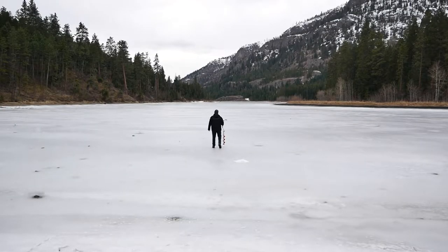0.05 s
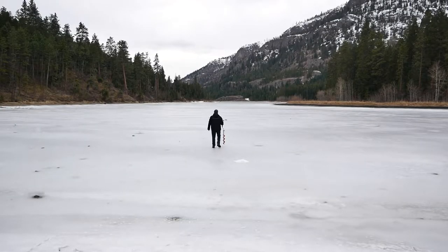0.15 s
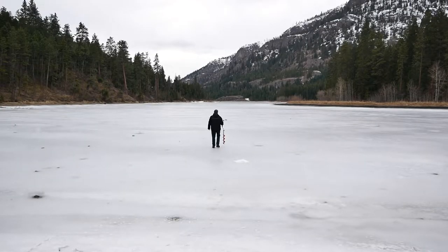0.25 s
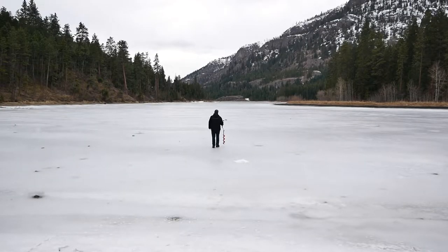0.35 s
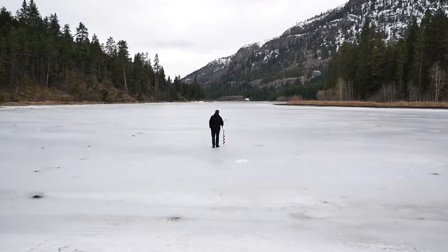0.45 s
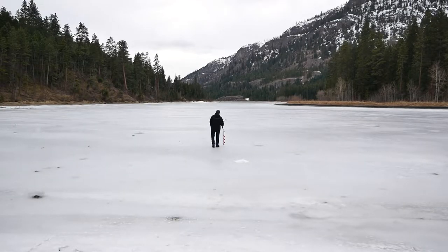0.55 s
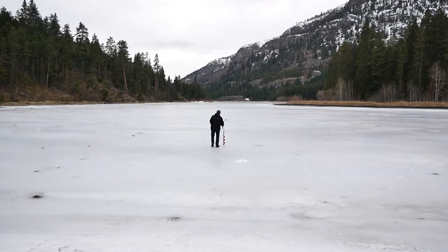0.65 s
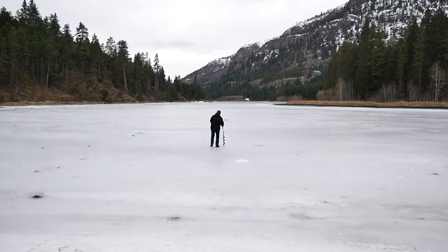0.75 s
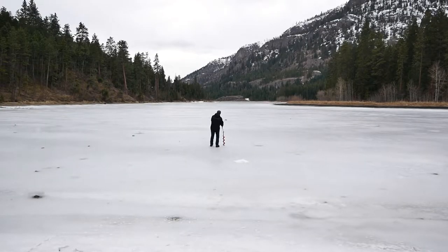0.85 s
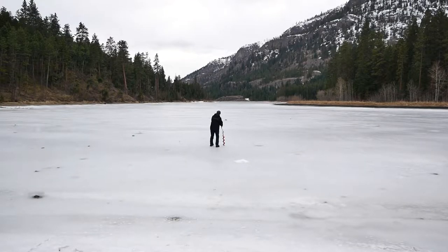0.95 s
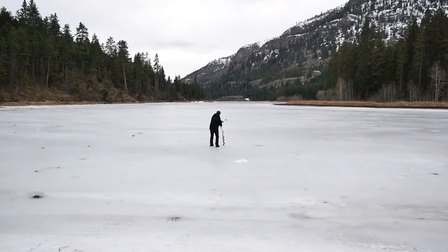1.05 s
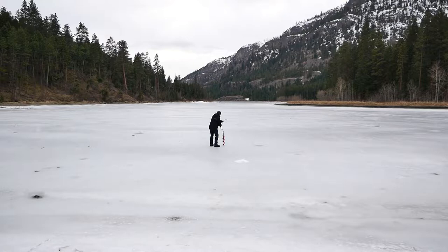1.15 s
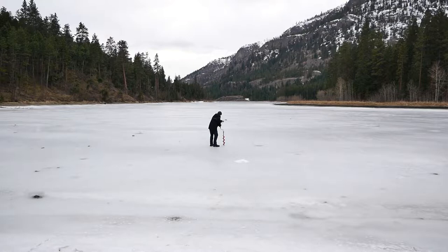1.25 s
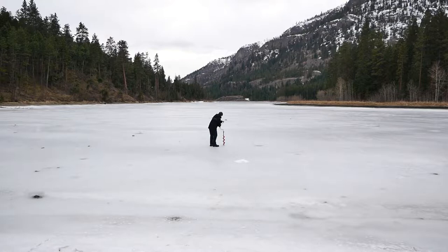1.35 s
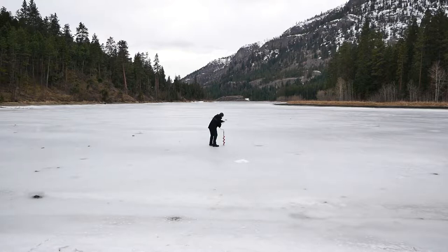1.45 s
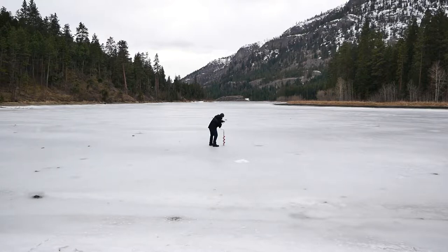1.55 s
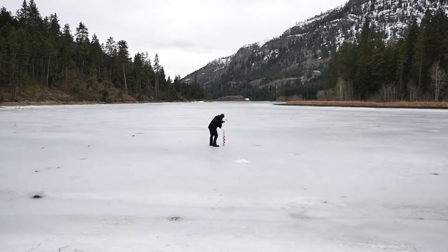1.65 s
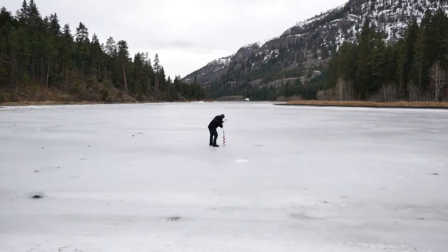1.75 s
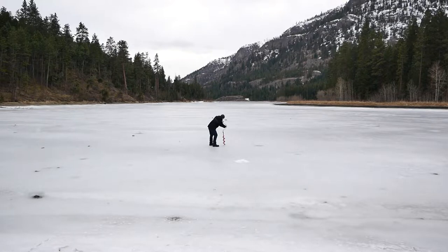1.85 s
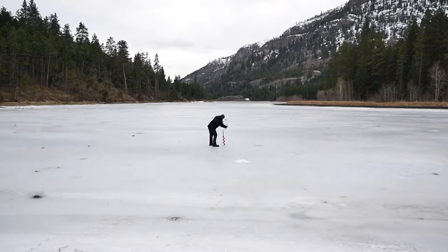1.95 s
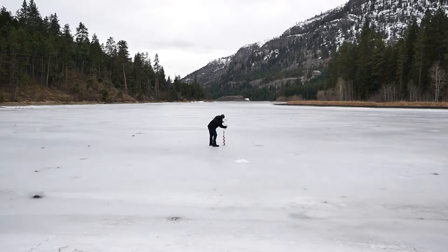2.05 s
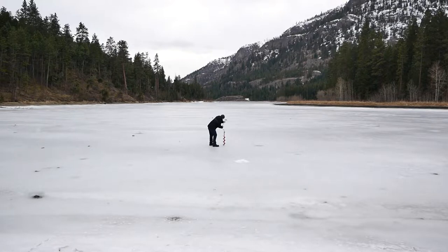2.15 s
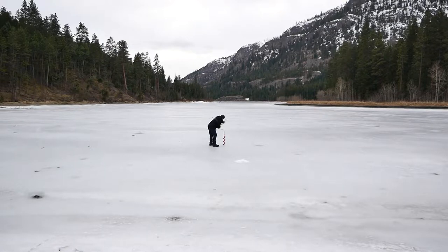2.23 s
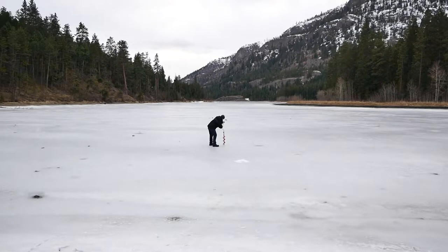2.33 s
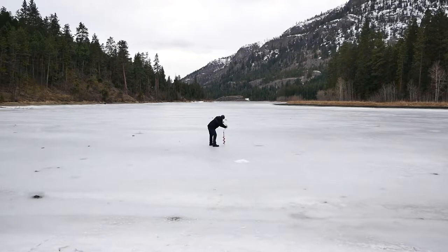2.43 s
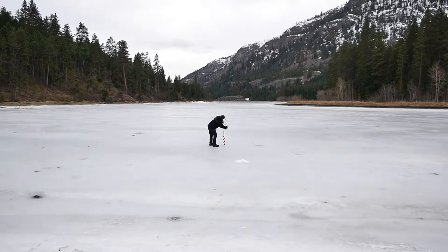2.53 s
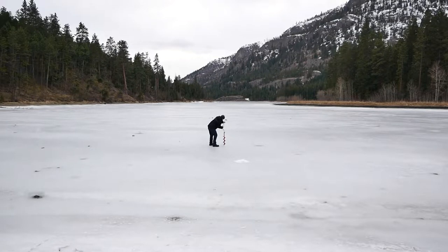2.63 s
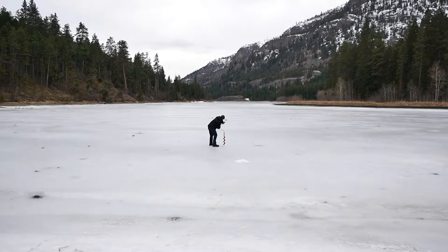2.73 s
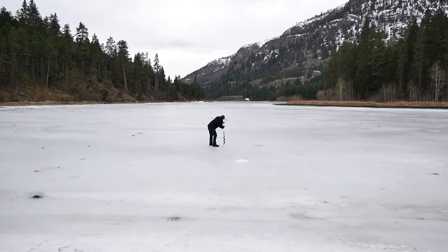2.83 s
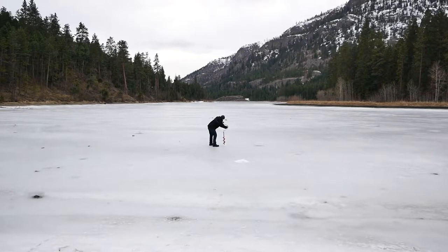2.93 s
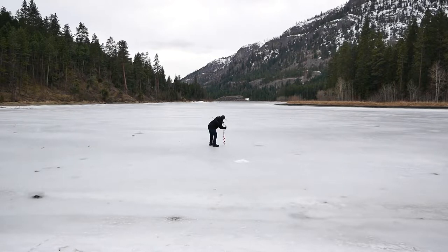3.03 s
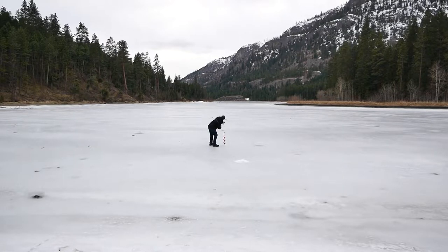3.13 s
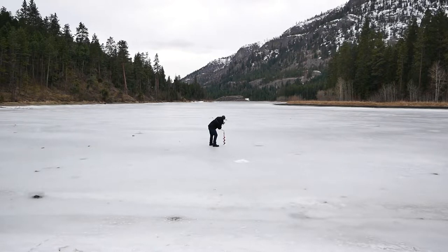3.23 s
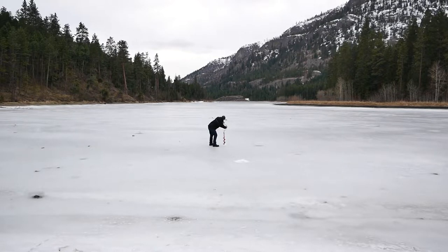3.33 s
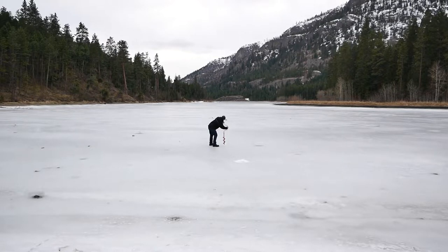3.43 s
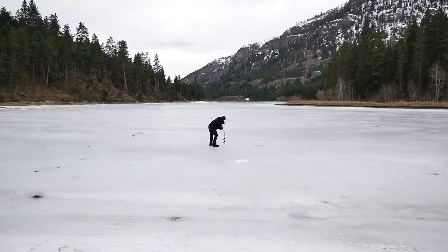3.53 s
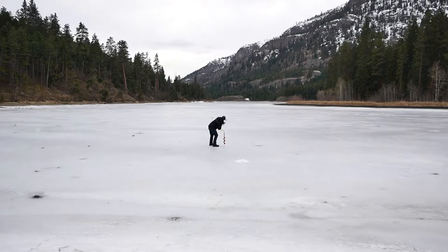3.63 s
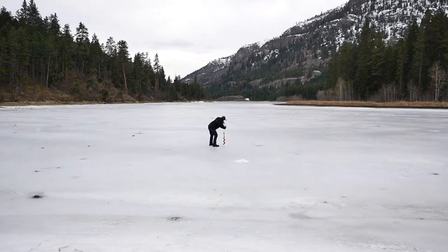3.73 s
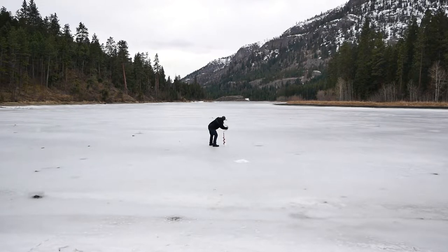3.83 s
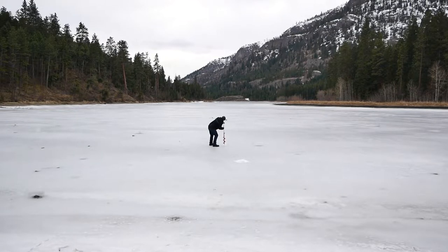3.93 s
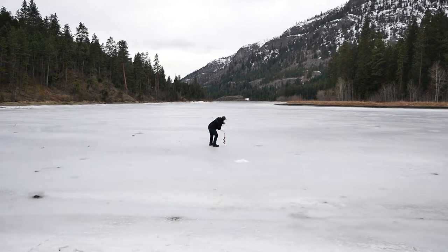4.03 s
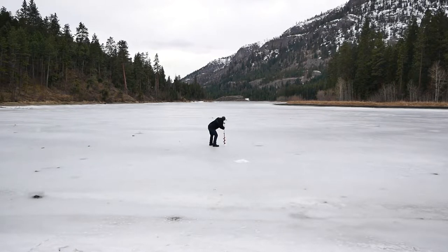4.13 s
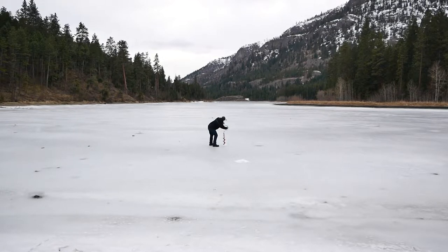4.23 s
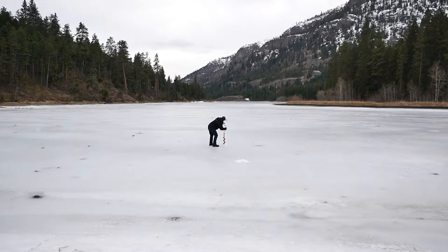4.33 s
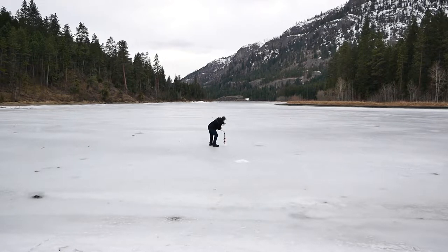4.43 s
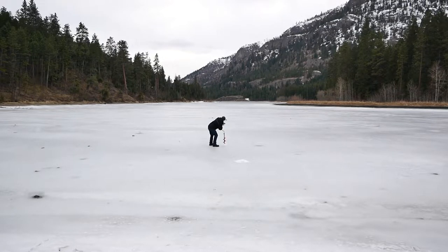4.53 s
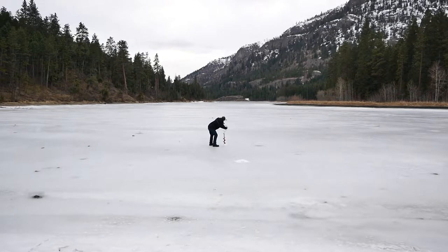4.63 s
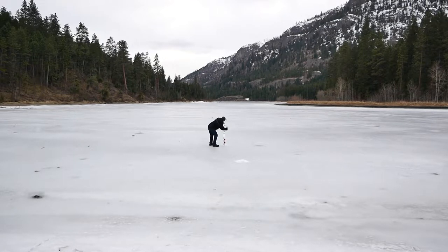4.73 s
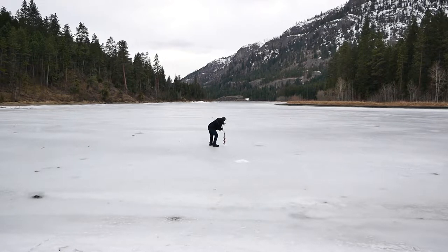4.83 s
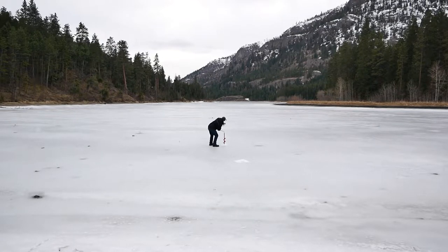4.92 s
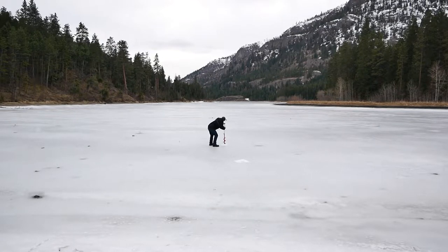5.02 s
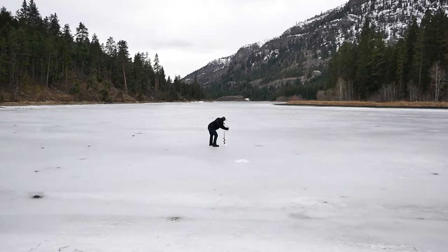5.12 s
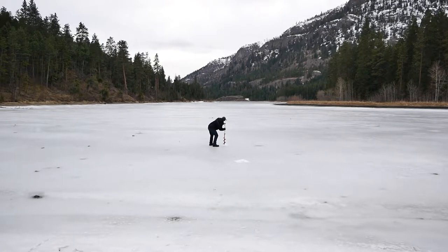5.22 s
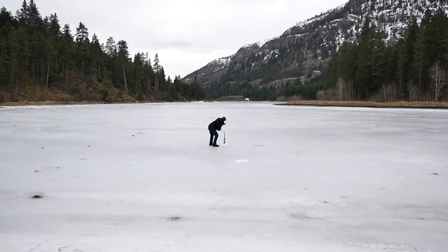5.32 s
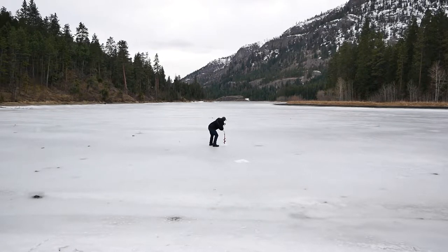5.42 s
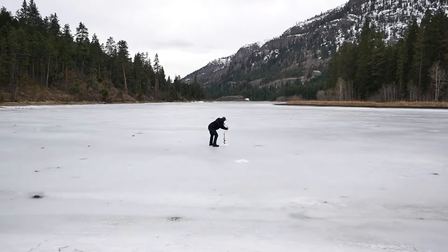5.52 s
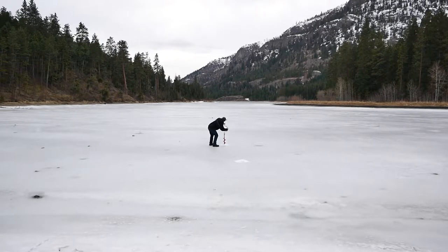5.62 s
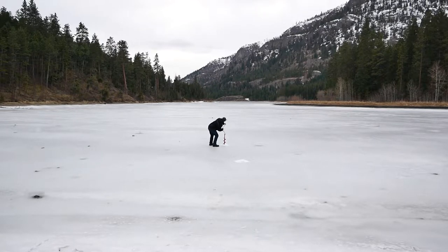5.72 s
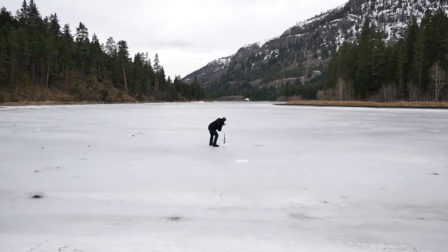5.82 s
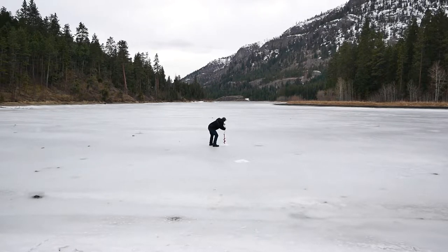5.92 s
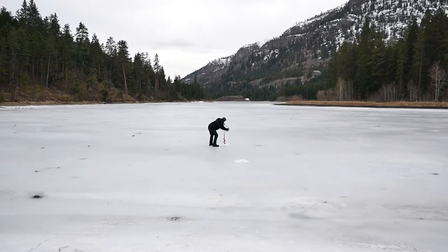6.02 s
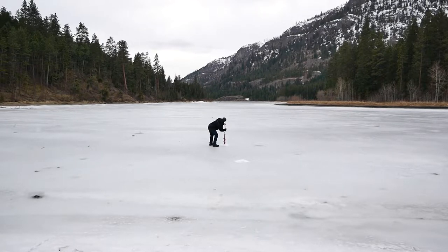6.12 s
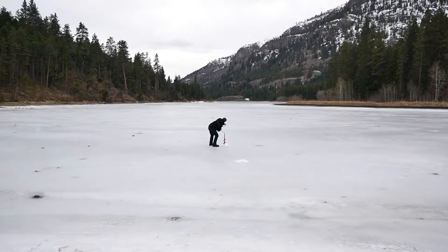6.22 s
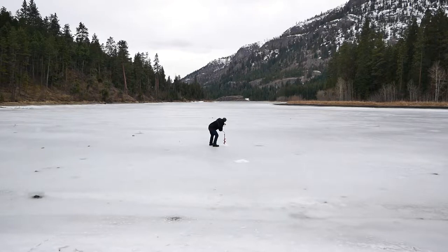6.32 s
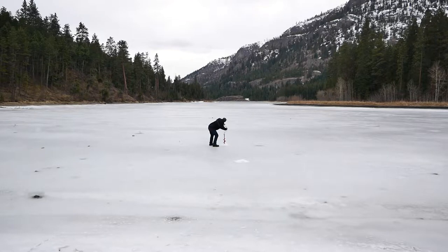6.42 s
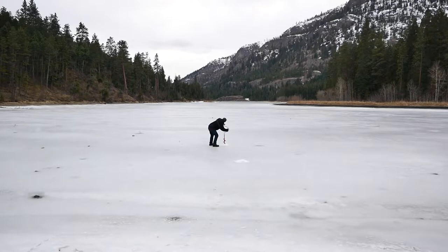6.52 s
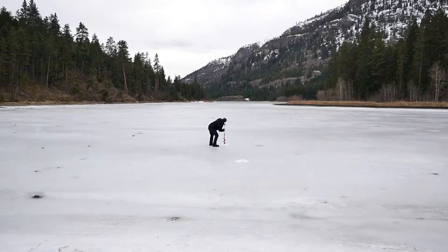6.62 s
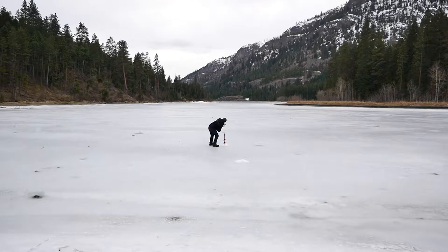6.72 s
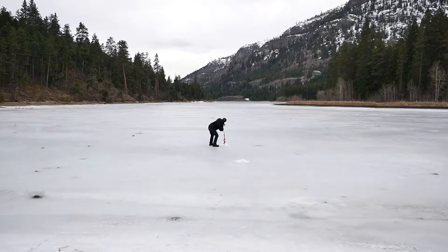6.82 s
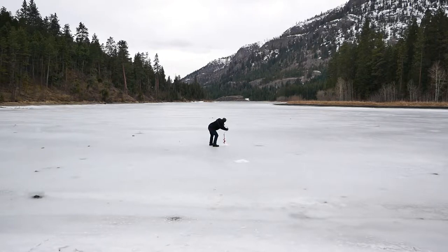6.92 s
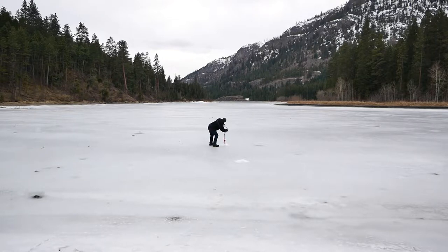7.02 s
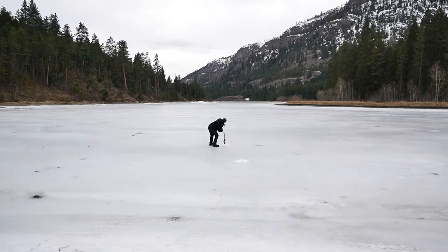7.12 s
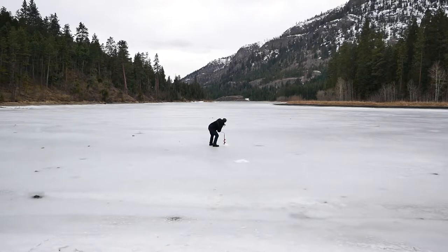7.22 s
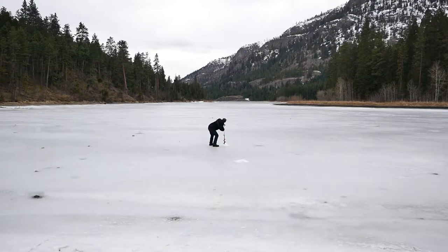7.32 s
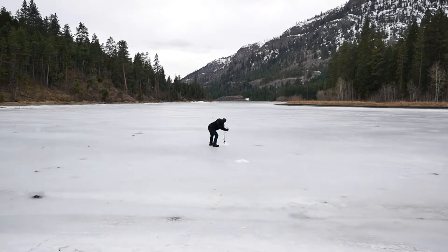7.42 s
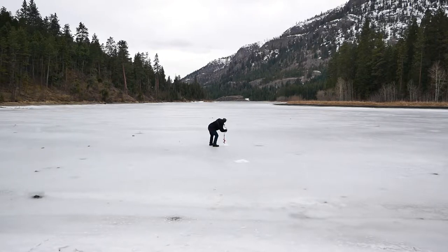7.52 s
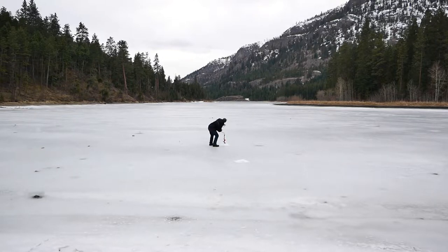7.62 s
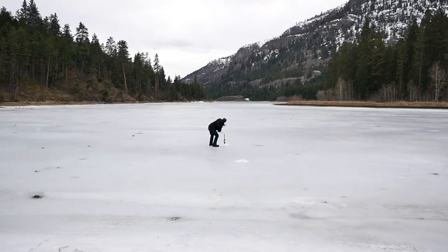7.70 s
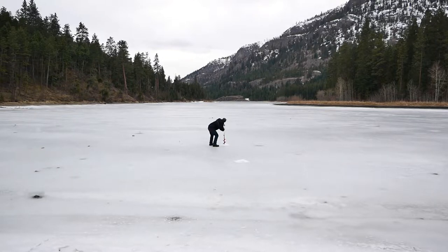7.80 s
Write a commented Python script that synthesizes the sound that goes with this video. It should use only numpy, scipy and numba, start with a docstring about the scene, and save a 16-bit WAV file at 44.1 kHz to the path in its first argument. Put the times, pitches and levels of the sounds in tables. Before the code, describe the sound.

A quiet frozen lake outdoors: low wind buffets the microphone over a soft hush and a very faint engine drone far off. From 0 to 2 s, boots, jacket and blade tips rub the ice in short grainy scuffs, clearest near 0.45, 0.87 and 1.3 s, some with sliding squeaks and tiny clicks. Around 1.7 to 2.5 s a hand auger skates lightly, then bites, reaching full force near 2.9 s. It grinds on without stopping, crunchy ice chips and hissing shavings ringing the steel, the tone swelling about every 0.45 s. Small knocks come at 3.3 s; harder cracks and clanks at 4.6 to 4.75, 5.1 to 5.9, 6.1, 6.5 and 7.55 s, the sharpest near 5.6. From about 4 s the grind gains body and a hollow low boom grows, throbbing with the blades, with deep shaft shudder. Wind rises slightly toward the end, drilling still going at 7.86 s.

```python
"""Light wind rumbles on the microphone over the hush and a far engine drone of the valley, all from filtered noise.
Boots, jacket and blade tips scuff on lake ice: grainy clicks with sliding squeaks. Lumps snap loose and knock the steel.
A hand auger skates a little, then bites and is cranked round: a hail of random ice chips rings the steel flighting,
whose notes swell and fade with each turn. As the hole deepens its bore booms and the shaft shudders, both from noise
through resonances."""
import sys
import numpy as np
from scipy import signal
from scipy.fft import rfft, irfft
from scipy.io import wavfile
from scipy.ndimage import uniform_filter1d
from numba import njit

SR = 44100
rng = np.random.default_rng(int(sys.argv[2]) if len(sys.argv) > 2 else 0)


def to_wav(s):
    """Save 16-bit WAV."""
    ch = np.atleast_2d(s).T  # columns
    pcm = np.round(np.clip(ch, -1, 1) * 32767)  # PCM
    wavfile.write(sys.argv[1], SR, pcm.astype(np.int16))


N = 346626
STEP = 32  # samples between slow control values

# how hard the blades cut, and how much the shavings slide up the flighting:
# time_s [s], bite_gain_db [dB], shavings_gain_db [dB]
CUT = [(1.569, -66, -61), (1.719, -41.5, -48), (1.81, -60, -48.5), (1.99, -39.5, -40), (2.1, -50, -47.5),
       (2.18, -38.5, -35), (2.57, -29, -31), (2.92, -22.5, -29.5), (3.2, -24.5, -31.5), (3.9, -23, -29.5),
       (4.7, -22.5, -28.5), (5.6, -24, -30), (6.25, -25, -32), (7.0, -24.5, -31), (7.2, -25.5, -32.5),
       (7.86, -27, -32.5)]
# moments when the crank handle passes the same place: time_s [s]
TURNS = [2.2, 2.65, 3.1, 3.55, 4.0, 4.42, 4.9, 5.35, 5.76, 6.2, 6.66, 7.18, 7.65, 8.1]


def undb(db):
    """Turn decibels into a plain multiplier."""
    return 10 ** (np.asarray(db) / 20)


def level(x, db):
    """Scale a sound so that its average (RMS) level is the given dB."""
    return x * undb(db) / np.sqrt(np.mean(x ** 2))


def gain_of(db):
    """Gain at every sample from slow dB values."""
    return np.repeat(undb(db), STEP)[:N]


def curves(table):
    """Columns of a table, joined by straight lines, at every sample."""
    s, *columns = np.transpose(table)
    return [np.interp(np.arange(N) / SR, s, column) for column in columns]


def turn_at(t):
    """Number of crank turns made by time t, counted from the first pass of the handle."""
    return np.interp(t, TURNS, np.arange(len(TURNS)))


def walk(rate):
    """Random levels held 1 / rate s and smoothed twice, one value every STEP samples; spread near 1."""
    hold, size = int(SR / STEP / rate), N // STEP + 1
    held = np.repeat(rng.standard_normal(size // hold + 1), hold)
    return 1.48 * uniform_filter1d(uniform_filter1d(held, hold), hold)[:size]


def colour(x, shape, size=4096):
    """Filter x to a curve of (Hz, dB), responding only after each input, and set its RMS to 1."""
    hz, db = np.transpose(shape)
    log_hz = np.log(np.fft.rfftfreq(size, 1 / SR) + 1)
    log_gain = np.interp(log_hz, np.log(hz), db) * np.log(10) / 20
    # folding the cepstrum makes the filter respond as early as it can, with no sound before its cause
    cepstrum = irfft(log_gain)
    cepstrum[1:size // 2] *= 2
    cepstrum[size // 2 + 1:] = 0
    response = irfft(np.exp(rfft(cepstrum)))
    return level(signal.fftconvolve(x, response)[:N], 0)


def ring(x, hz, width_hz):
    """One resonance, gain 1 at its centre; a narrow one rings longer."""
    return signal.lfilter(*signal.iirpeak(hz, hz / width_hz, SR), x)


@njit
def sweep(x, hz, damping):
    """A resonance whose centre moves (state-variable band-pass); damping is width over pitch."""
    y, band, low = np.empty(len(x)), 0., 0.
    for i in range(len(x)):
        g = np.tan(np.pi * hz[i] / SR)
        v = (band + g * (x[i] - low)) / (1 + g * (g + damping))
        band, low, y[i] = 2 * v - band, low + 2 * g * v, damping * v
    return y


def soften(x, hz):
    """Contact that lasts a moment dulls the top."""
    return signal.sosfilt(signal.butter(2, hz, fs=SR, output="sos"), x)


def chips(rate, spread_db, flurry_db, push=0.44):
    """Random clicks, rate per second, a few much larger, in flurries and mostly pushing one way."""
    when, size, sign = rng.random(N), rng.exponential(size=N), rng.standard_normal(N)
    clicks = (when < rate / SR) * (sign + push) * undb(spread_db * size)
    hail = clicks * gain_of(flurry_db * walk(60))
    return level(signal.sosfilt(signal.butter(2, 500, "high", fs=SR, output="sos"), hail), 0)


def air():
    """Wind buffets and rumbles on the microphone over the distant hush, each a coloured noise."""
    # wind on the microphone: time_s [s], buffet_db [dB], rumble_db [dB]
    wind_levels = [(0.0, -43, -48), (1.0, -43.5, -45.5), (1.6, -46, -50.5), (2.0, -39, -49),
                   (2.5, -49, -52), (4.2, -49.5, -45.5), (5.5, -46, -47), (6.4, -40.5, -47),
                   (7.86, -36.5, -42)]
    # tone of the buffeting, the rumble and the hush: frequency_hz [Hz], relative_level_db [dB per Hz]
    buffet_tone = [(6, -3), (14, 4.5), (24, 12), (34, 13), (45, -6), (70, -45.5)]
    rumble_tone = [(35, -10), (60, 8.5), (125, -6), (165, -5), (270, -11), (400, -22), (800, -78)]
    hush_tone = [(120, -18), (220, 2), (400, -6.5), (630, -9), (900, -9.5), (1400, -9), (1800, -15.5),
                 (2600, -24), (4000, -34), (8000, -51), (15600, -68)]
    buffet_db, rumble_db = curves(wind_levels)
    buffet = colour(rng.standard_normal(N), buffet_tone, size=32768)
    rumble = colour(rng.standard_normal(N), rumble_tone, size=32768)
    wind = undb(buffet_db) * buffet + undb(rumble_db) * rumble
    hush = colour(rng.standard_normal(N), hush_tone)
    return wind + undb(-52.5) * hush


def drone():
    """A far engine down the valley: narrow bands of noise that glide with its speed."""
    # engine speed as a base frequency: time_s [s], base_hz [Hz]
    engine_speed = [(0, 132.5), (.8, 123), (1.4, 115.5), (2.4, 116), (3.2, 113.5), (4.5, 123), (7.86, 108)]
    # its partials: multiple of the base frequency [ratio], level_db [dB]
    partials = [(.72, -55.5), (0.999, -55), (2.33, -63.5)]
    hz, noise = curves(engine_speed)[0], rng.standard_normal(N)
    total = 0
    for multiple, db in partials:
        band = sweep(sweep(noise, multiple * hz, 0.044), multiple * hz, 0.051)
        total = total + level(band, db)
    return total


def swell(t, rise, hold, fall):
    """Rise, hold and fall, straight in dB."""
    fade_db = 26.5
    up = np.minimum(np.minimum(t / rise, (rise + hold + fall - t) / fall), 1)
    return undb(fade_db * (up - 1))


def scuffs():
    """Grainy rubbing of boots, jacket and blade tips, with a squeaky resonance that slides."""
    # start_s [s], rise_s [s], hold_s [s], fall_s [s], hiss_db [dB], squeak_db [dB],
    # squeak pitch it starts from_hz [Hz] and glides towards to_hz [Hz], squeak fade linger_s [s]
    scuff_list = [(0.0, 0.0069, 0.2, .03, -63.5, -59, 1320, 1100, .05),
                  (0.1, .035, .008, .03, -50, -62, 1330, 1300, .05),
                  (0.452, .004, 0.042, 0.077, -40, -67, 1390, 1700, .08),
                  (0.641, 0.073, 0.022, 0.051, -46.5, -68, 1900, 1900, .06),
                  (0.867, .002, 0.013, 0.077, -38, -41.5, 2280, 1750, 0.23),
                  (0.987, 0.0018, 0.064, 0.037, -48, -63, 1950, 2100, 0.06),
                  (1.03, 0.037, .1, .04, -62.5, -80, 1600, 1100, .05),
                  (1.158, 0.029, 0.13, 0.094, -53.5, -63, 1830, 1700, .06),
                  (1.27, 0.16, 0.038, .09, -40, -46.5, 1260, 1220, 0.067),
                  (1.458, 0.028, 0.11, .05, -58, -71, 1500, 1500, 0.044),
                  (1.62, .003, .04, 0.087, -59, -55, 1500, 1500, .1),
                  (1.602, 0.094, 0.073, 0.054, -43.5, -59, 1400, 1200, .05),
                  (1.802, .14, 0.095, .08, -45.5, -56, 1900, 1700, .05)]
    # tone of the hiss: frequency_hz [Hz], relative_level_db [dB per Hz]
    hiss_tone = [(1500, -1), (2400, -2), (3900, -2), (6300, -9), (8100, -3), (9400, -16.5), (13000, -19),
                 (15600, -21)]
    grit, out = chips(6000, 0.47, 2.5), np.zeros(N)
    hiss, t = colour(grit, hiss_tone), np.arange(SR // 2) / SR
    for start, rise, hold, fall, hiss_db, squeak_db, from_hz, to_hz, linger in scuff_list:
        first = int(start * SR)
        part = slice(first, first + len(t))
        glide_s = 0.019 + rise + hold
        hz = to_hz + (from_hz - to_hz) * np.exp(-t / glide_s)
        squeak = level(sweep(sweep(grit[part], hz, 0.19), hz, .5), 0)
        early = 0.49 * rise  # the squeak speaks a little before the hiss is full
        out[part] += undb(hiss_db) * swell(t, rise, hold, fall) * hiss[part]
        out[part] += undb(squeak_db) * swell(t, early, hold + rise - early, linger) * squeak
    return out


def cracks():
    """A short damped snap and a noisy splinter for each knock, and the blow that it gives the steel."""
    # lumps that crack loose, and knocks on the steel; the first, at 0.867 s, is the auger tip set down on the
    # ice: # time_s [s], strength_db [dB], decay_s [s], blow to the steel against the strength ring_db [dB]
    crack_list = [(0.867, -39, 0.00044, 6), (0.879, -29, 0.00039, 7), (0.989, -34, 0.00026, 8),
                  (1.614, -35, 0.00067, -1), (3.269, -19.5, 0.00097, 8), (3.295, -30, 0.0005, 3),
                  (3.386, -27, 0.00051, 6), (4.61, -14.5, 0.0019, 8), (4.72, -11, 0.00051, 18),
                  (4.735, -8, 0.00068, -3), (5.139, -12.5, 0.00073, 15), (5.357, -17, 0.0006, 17),
                  (5.58, -8, 0.00044, 1), (5.598, -0.5, 0.00029, -10), (5.665, -11, 0.0003, 6),
                  (5.909, -5, 0.00045, -6), (6.096, -6, 0.00027, -5), (6.501, -19, 0.00058, 12),
                  (7.548, -17, 0.00042, 11)]
    snaps, blows, t = np.zeros(N), np.zeros(N), np.arange(1000) / SR
    noise = rng.standard_normal((len(crack_list), len(t)))
    for (s, db, decay, ring_db), grain in zip(crack_list, noise):
        i = int(s * SR)
        snap = -np.sin(2 * np.pi * 1500 * t) * np.exp(-t / decay)
        splinter = grain * np.exp(-t / 0.004)
        snaps[i:i + len(t)] += undb(db) * (1.4 * snap + 0.11 * splinter)
        blows[i:i + len(t)] += undb(db + ring_db) * snap
    snaps = signal.sosfilt(signal.butter(3, [500, 9000], "band", fs=SR, output="sos"), snaps)
    return snaps, soften(blows, 6800)


def effort(t, turn):
    """Bite and shavings gains in dB: the cut, the heave of the arm, the grabs and a little unevenness."""
    # blades grabbing (+) or slipping (-) for a moment:
    # time_s [s], half_length_s [s], bite_change_db [dB], shavings_change_db [dB]
    grabs = [(3.22, 0.031, -3, -0.5), (3.697, .08, -1.5, 1), (4.32, 0.032, 1.5, 2.5), (4.385, .03, -2, -5),
             (4.731, 0.035, 3.5, 3.5), (4.895, 0.017, -1.5, -4), (5.194, 0.081, 1.5, 1),
             (5.31, 0.019, -3, -2.5), (5.361, 0.039, 8, 1), (5.6, 0.01, 7, 7.5), (5.8, 0.064, -1, -1.5),
             (6.334, 0.049, 5, 1), (6.46, 0.076, -3.5, -2), (6.553, 0.089, 1, 3), (6.612, 0.017, -5, 1),
             (7.15, 0.085, -3.5, -2), (7.41, 0.03, -2.5, -5.5), (7.461, 0.042, 3.5, 3.5)]
    s, bite_db, slide_db = np.transpose(CUT)
    # the arm leans harder once a turn
    heave_db = 0.58 * np.cos(2 * np.pi * (turn - 0.5)) * (turn > 0)
    uneven_db = .6 * walk(18)
    bite_db = np.interp(t, s, bite_db) + heave_db + uneven_db
    slide_db = np.interp(t, s, slide_db) + heave_db + uneven_db
    for at, half, more_bite_db, more_slide_db in grabs:
        bump = np.clip(1 - abs(t - at) / half, 0, 1)
        bite_db = bite_db + more_bite_db * bump
        slide_db = slide_db + more_slide_db * bump
    return bite_db, slide_db


def steel_modes(t, turn, coarse, fine, blows):
    """The steel's own notes, rung by chips, dust and blows; each beams round with the crank."""
    # pitch of each note: pitch_hz [Hz]
    mode_pitches = [843, 960, 1145, 1277, 1445, 1530, 1748, 1927, 2050, 2200, 2790, 3754, 5230, 7478, 7600,
                    8081, 8283, 8480, 9410]
    # for each note: width_hz [Hz], level_db [dB, relative], drift with drilling [dB per s],
    # once-a-turn swing_db [dB] and lag [turns], twice-a-turn swing_db [dB] and lag [turns]
    mode_settings = [(21.5, 7, 1.86, -2.5, -1.2, 0, -0.081), (77, -6, 2.3, -9.5, 0.78, 0.5, 0.12),
                     (55.556, -10.5, 2, 9, 0.37, 3, 0.13), (38, 0, 3.4, 10.5, 0.18, 2.2, 0.19),
                     (30, -9.5, 2.7, 15, -0.023, 5.2, -0.078), (50, -12, 1, 12.5, -1.1, -6.5, 0.064),
                     (42.7, -3.5, -1.5, 2, -0.42, 5.5, 0.048), (52, 0, 1.1, 2, 0.23, 5, 0.32),
                     (89, -2, 2.5, 0.5, -0.68, 2.5, 0.12), (86.4, -30.5, 0.5, 26.5, 0.001, 4, 0.16),
                     (70, -2, .3, 7, 0.21, .4, 0.21), (27, -5, 0.2, 3.5, 0.24, 0, 0.14),
                     (78.5, -14.5, -4, -2, 0.16, 6, 0.14), (25, -1.5, 1.4, -2.5, 0.21, .4, 0.065),
                     (90, -9, -2, 4, 0.21, -1, 0.13), (32, -5, .3, -4, 0.22, -6, 0.058),
                     (80, -10, .3, 4, 0.25, 5, 0.075), (70, -10, 2.5, -1, 0.29, -6, .1),
                     (150, -17, 2, -9, -0.051, 0, 0.03)]
    skating = np.clip((2.8 - t) / 0.13, 0, 1)
    low, high, knocks, power = 0, 0, 0, 0
    for hz, (width_hz, db, drift_db, once_db, lag, twice_db, lag_twice) in zip(mode_pitches, mode_settings):
        once = -once_db * np.cos(2 * np.pi * (turn - lag))
        twice = -twice_db * np.cos(4 * np.pi * (turn - lag_twice))
        # blades that only skate hardly stir the lowest modes
        skate_loss_db = 10 * skating * (850 / hz) ** 3
        share_db = db + drift_db * (t - 5) + once + twice - skate_loss_db
        gain = gain_of(share_db) / np.sqrt(width_hz)
        # coarse chips drive the low modes, fine dust the high ones
        if hz < 2500:
            low = low + gain * ring(coarse, hz, width_hz)
            power = power + undb(2 * share_db)
        else:
            high = high + gain * ring(ring(fine, hz, width_hz), hz, 6 * width_hz)
        knocks = knocks + undb(db) * ring(blows, hz, width_hz)
    # the low modes share the force of the bite among them
    low = low * gain_of(-10 * np.log10(power))
    return low, high, knocks


def glints(x, turn, count=66):
    """The crowd of small high modes of the flighting, each flashing at its own angle of the turn."""
    out = 0
    for k, (place, lag) in enumerate(rng.random((count, 2))):
        hz = 2300 + (k + place) * 125
        flash_db = 5 * np.cos(2 * np.pi * (turn - lag)) + 4 * walk(14)
        out = out + ring(x, hz, 80) * gain_of(flash_db)
    return level(out, 0)


def auger():
    """Ice chips crush under the blades and strike the steel, and shavings slide up the flighting."""
    # tone of the crushed ice and of the shavings: frequency_hz [Hz], relative_level_db [dB per Hz]
    crush_tone = [(380, -39), (560, -2), (750, 0.5), (1100, 5.5), (1500, 4.5), (1650, -15), (1850, 2),
                  (2300, -23.5), (3000, -29.5)]
    shavings_tone = [(1500, -13), (2200, -7), (3000, -7.5), (3700, -4), (4900, -12.5), (5700, -12),
                     (6500, -19.5), (7500, -8), (8000, -10), (9200, -22.5), (9600, -23.5), (10700, -29),
                     (12800, -21), (15600, -55)]
    t = np.arange(N // STEP + 1) * STEP / SR
    cutting = np.clip((np.arange(N) / SR - CUT[0][0]) / .005, 0, 1)
    turn = turn_at(t)
    bite_db, slide_db = effort(t, turn)
    hail, dust = chips(6000, 1.47, 1.0), chips(12000, 1.34, .9)
    snaps, blows = cracks()
    coarse = level(soften(hail, 2340), 0)
    fine = level(soften(chips(12000, 1.4, .9), 9200), 0)
    low, high, knocks = steel_modes(t, turn, coarse, fine, blows)
    # a deeper hole lends the crushing more body
    body = level(ring(ring(hail, 287, 700), 780, 710), -20.5)
    body = body * gain_of(8.5 * np.tanh((t - 4.1) / 0.43))
    crunch = colour(hail + chips(4000, 2.7, 0.65), crush_tone)
    crushing = level(low, -2.55) + level(crunch, -6.5) + body
    hiss = colour(dust + 0.28 * hail, shavings_tone)
    sliding = level(hiss, -6.5) + level(glints(hiss, turn), -4.0) + level(high, -9)
    drilling = gain_of(bite_db) * crushing + gain_of(slide_db) * sliding
    return cutting * drilling + snaps + knocks


def hole():
    """The air column in the bore booms as the hole deepens and the shaft shudders: noise through resonances."""
    # shudder of the shaft: time_s [s], level_db [dB]
    shudder_levels = [(3.6, -52), (4.3, -65), (4.6, -42.5), (5.2, -40), (5.5, -34), (5.8, -37.5),
                      (6.2, -36.5), (6.65, -44), (7.1, -33.5), (7.86, -47)]
    from_s, deep_s = 3.8, 7.06
    bore_hz, low_hz, shaft_hz = 263, 130, 39
    t = np.arange(N) / SR
    depth = np.clip((t - from_s) / (deep_s - from_s), 0, 1)  # 0 shallow, 1 deep
    # the boom throbs as each of the two blades comes round
    throb_db = 4.5 * depth ** 2 * np.cos(4 * np.pi * (turn_at(t) - .18))
    boom_db = -54 + (-33 + 54) * depth ** 0.73 + throb_db
    shudder_db = curves(shudder_levels)[0]
    grown = np.clip((t - from_s) / .5, 0, 1)
    noise = rng.standard_normal((2, N))
    main_note = ring(ring(noise[0], bore_hz, 16), bore_hz, 65)
    # a broad upper note gives way to the main one with depth
    high_note = undb(0.5 + (-7.5 - 0.5) * depth ** 2) * ring(ring(noise[1], 323, 64), 300, 110)
    # a lower note comes up near the end, rising 14 dB per s
    low_note = undb(-10.5 + 14 * (t - t[-1])) * ring(ring(noise[1], low_hz, 21), low_hz, 51)
    boom = main_note + high_note + low_note
    shudder = ring(ring(noise[1], shaft_hz, 3.2), shaft_hz, 7.2)
    shudder = shudder + undb(-16) * ring(ring(noise[0], 77, 14), 76, 35)
    return grown * (undb(boom_db) * level(boom, 0) + undb(shudder_db) * level(shudder, 0))


def scene():
    """All the sources added together, as one channel."""
    return (air() + drone() + scuffs() + auger() + hole())[None]


def record(dry):
    """The recorder cuts the top, steeply above 15640 Hz."""
    return signal.sosfilt(signal.ellip(12, .2, 80, 15640, fs=SR, output="sos"), dry)


dry = scene()
out = record(dry)
to_wav(out)
```